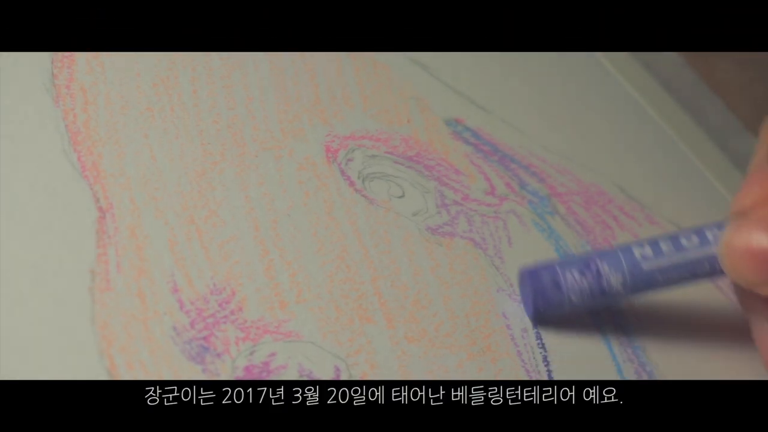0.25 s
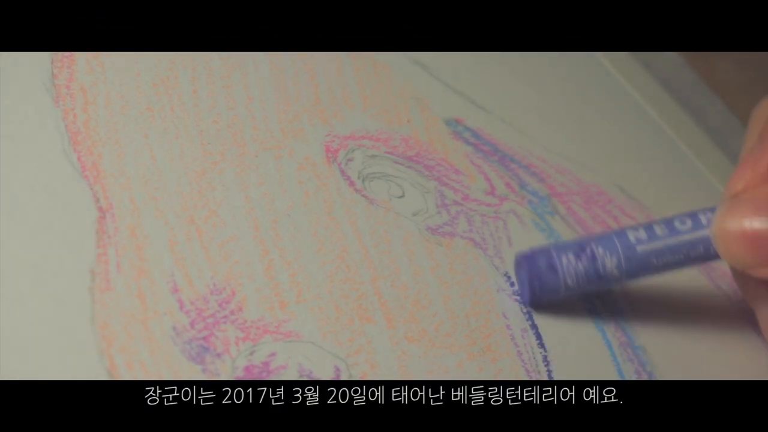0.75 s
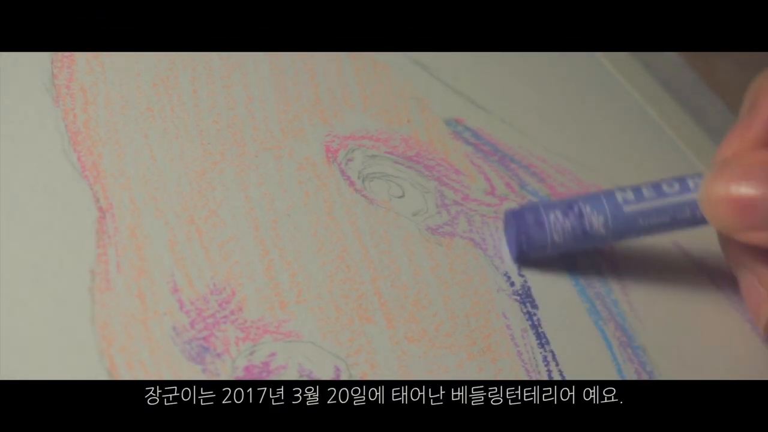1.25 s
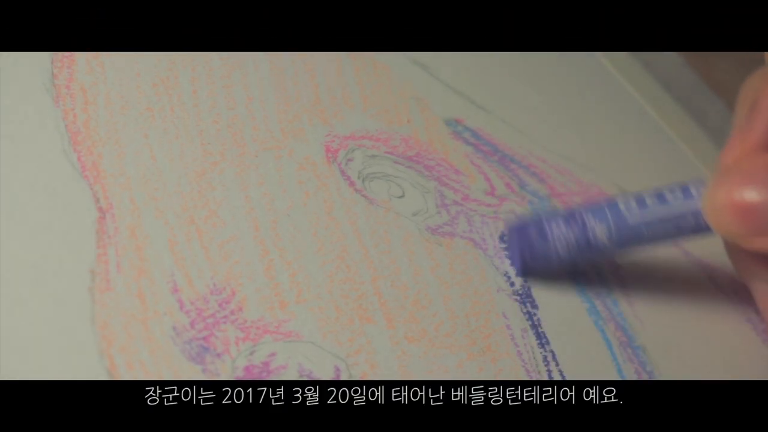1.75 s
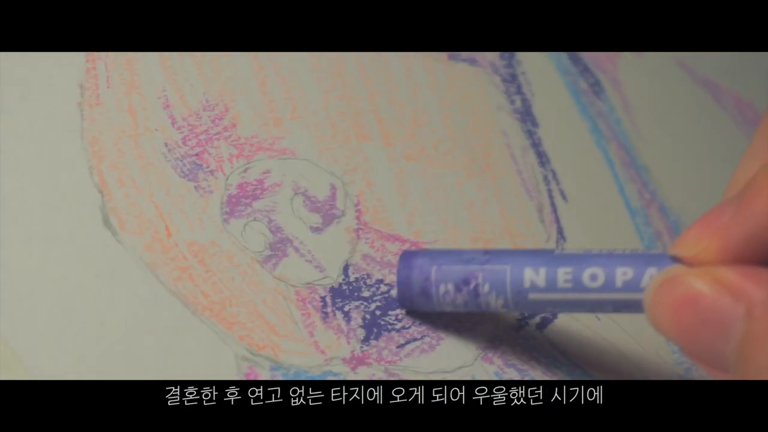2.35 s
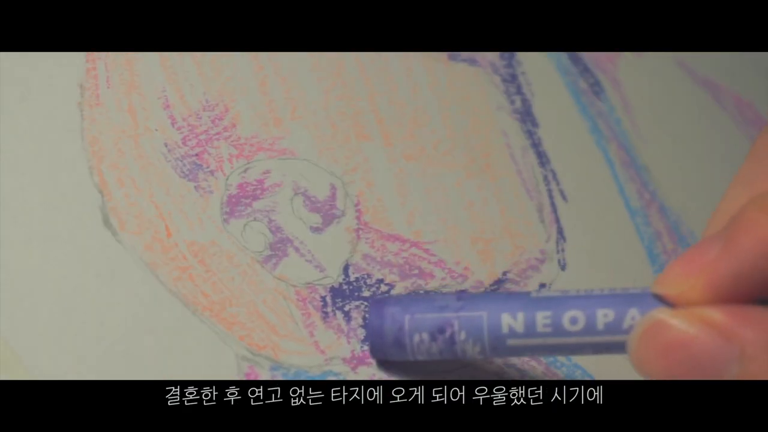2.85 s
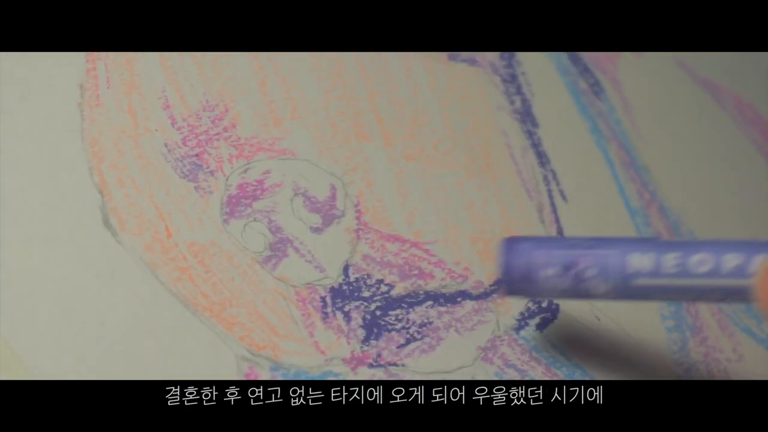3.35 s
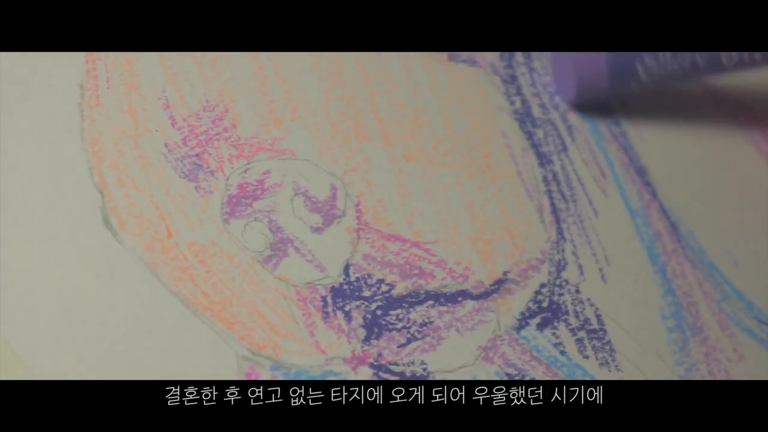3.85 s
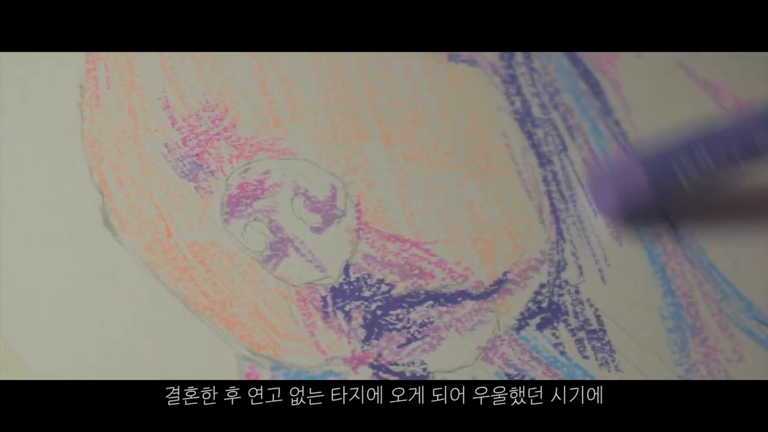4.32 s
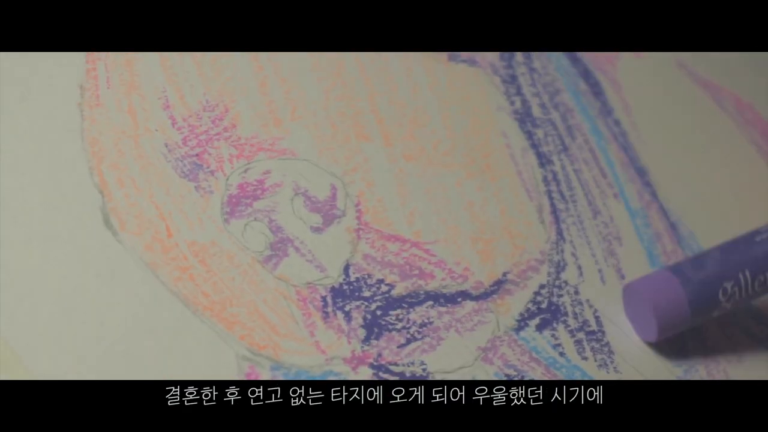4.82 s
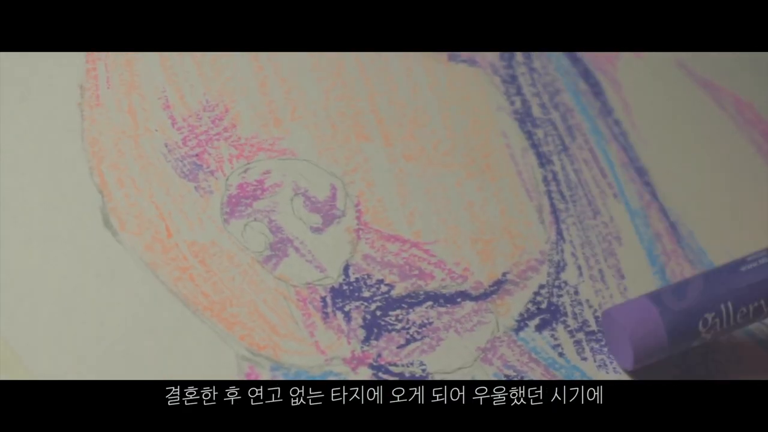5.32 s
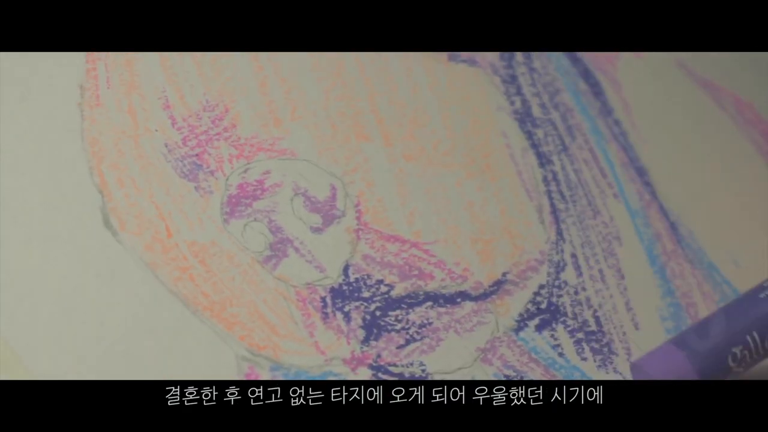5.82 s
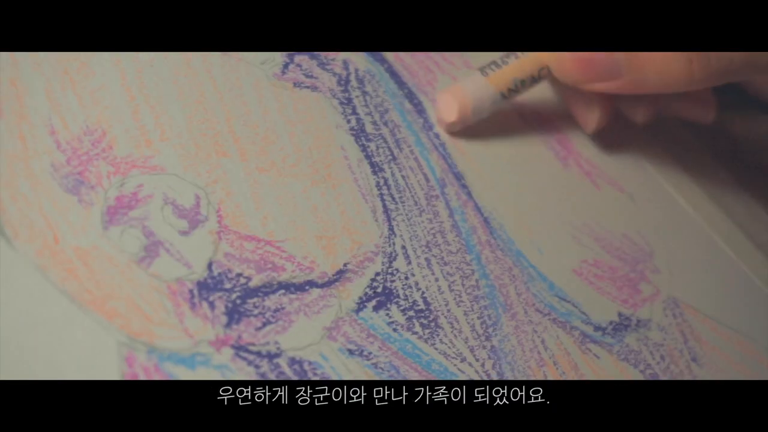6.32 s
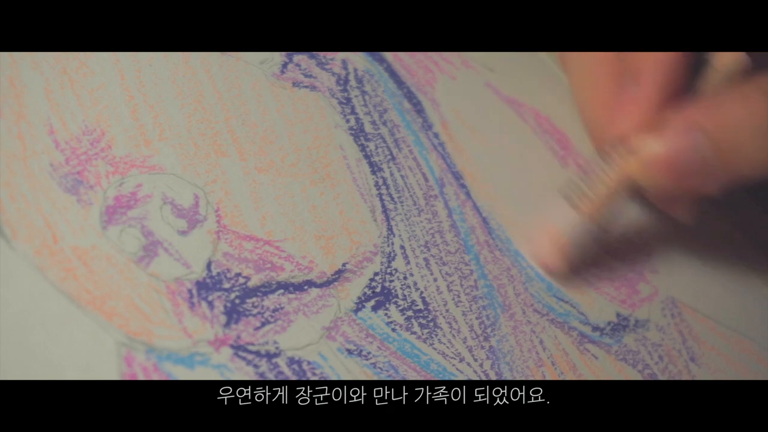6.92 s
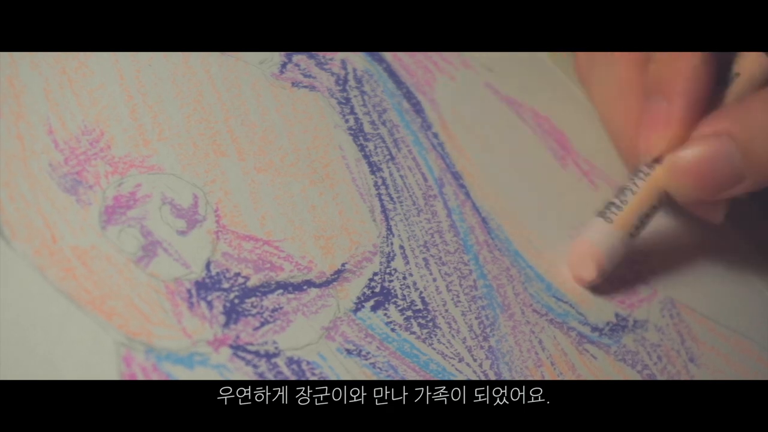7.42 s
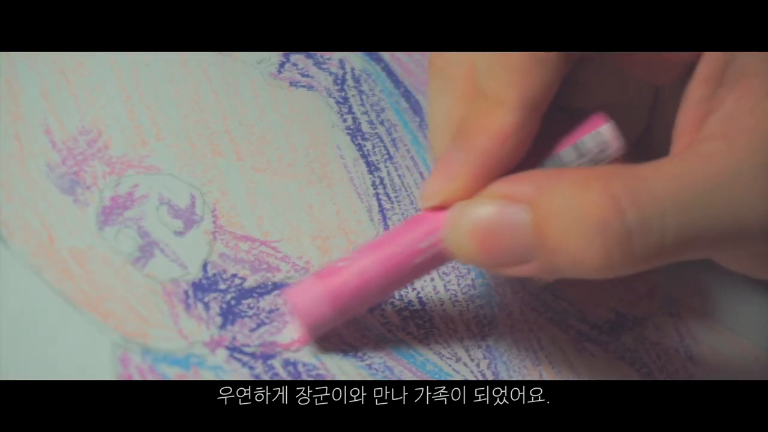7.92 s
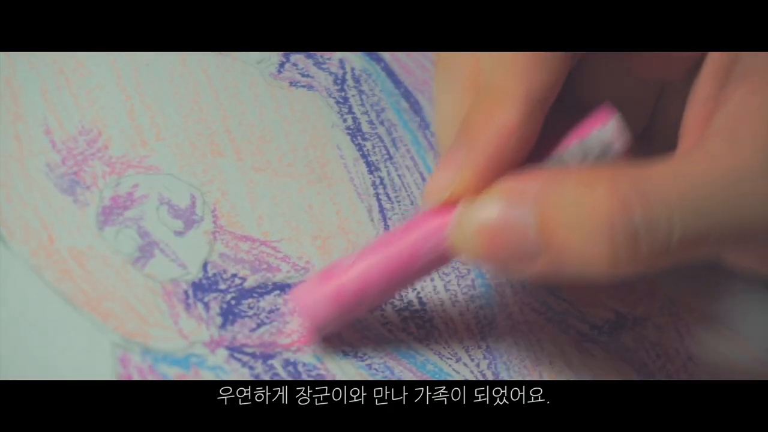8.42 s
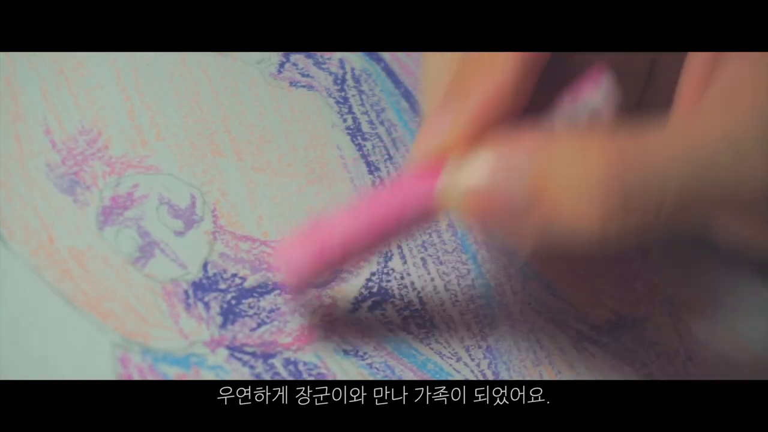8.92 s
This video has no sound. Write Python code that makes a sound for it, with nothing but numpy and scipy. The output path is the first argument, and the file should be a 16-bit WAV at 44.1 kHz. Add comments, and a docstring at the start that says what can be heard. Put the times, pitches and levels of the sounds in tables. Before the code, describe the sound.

In a small quiet room, a waxy stick rubs paper on a hollow board, heard very close. About a second of rapid muted strokes weakens to almost nothing, broken by tiny taps. Louder scrubbing returns, first regular with a slight thin rattle, later slower and scratchier with soft bumps, and finally weakens. Low table rumble and soft background hiss run throughout.

```python
"""Oil pastels scrub back and forth on paper that lies on a drawing board, heard close up in a quiet room.
Quick strokes come first: stick-slip clicks ring the board's modes, and grains of wax hiss on the paper.
From 2 s a pause holds a few weak strokes, knocks and short ticks; a thin metallic ring, as decaying modes,
sounds from 3.3 to 4.9 s. From 3.7 s stronger strokes with more wax hiss go on to the end, among knocks.
Filtered noise gives a deep rumble and a steady hiss with a faint hum throughout."""
import sys
import numpy as np
from scipy import signal
from scipy.fft import rfft, irfft, next_fast_len
from scipy.io import wavfile
from scipy.ndimage import uniform_filter1d

SR = 44100
rng = np.random.default_rng(int(sys.argv[2]) if len(sys.argv) > 2 else 0)


def transcribe(u):
    """Save the signal u as a 16-bit wav file named by the first command-line argument.

    u: samples, shape (n,) or (channels, n), limited to [-1, 1]; the rate is SR.
    q: integer samples, one column per channel.
    """
    v = np.clip(np.atleast_2d(u).T, -1, 1)
    q = np.round(v * 32767).astype(np.int16)
    wavfile.write(sys.argv[1], SR, q)


N = 403956
T = np.arange(N) / SR  # time [s]

# pastel strokes: (start [s], length [s], middle board modes [dB], low modes against middle [dB],
# high modes against middle [dB], wax hiss before the pastel's colour [dB])
STROKE_LIST = [(-0.02, 0.087, -57, 5.5, -9.5, -72), (0.115, 0.086, -55.5, -1, -24, -80),
               (0.211, 0.074, -60.5, -4, -12, -79), (0.339, 0.083, -50.5, -1.5, -20.5, -77),
               (0.457, 0.088, -51.5, 1, -21, -75), (0.59, 0.11, -57, 3, -12, -79),
               (0.701, 0.096, -58.5, 0, -20, -81), (0.819, 0.11, -48.5, -1, -17.5, -74),
               (0.936, 0.13, -53.5, -2, -11.5, -73), (1.06, 0.17, -58, -0.5, -16, -82),
               (1.197, 0.12, -68, 7, -3, -78), (1.5, 0.13, -73.5, 8, 3, -79),
               (1.603, 0.15, -59.5, -2, -19, -83), (1.721, 0.18, -60, 3.5, -12.5, -84),
               (1.945, 0.089, -72, 7, -2, -79), (2.265, 0.2, -70, 10, -11, -92),
               (3.173, 0.092, -69.5, 4.5, -11, -82), (3.703, 0.12, -50.5, -1, -15.5, -64.5),
               (3.866, 0.14, -61, 7.5, 1, -64), (4.04, 0.094, -44, -5, -15.5, -70),
               (4.172, 0.11, -41, -3.5, -16.5, -67.5), (4.317, 0.11, -42.5, -2.5, -24, -68.5),
               (4.466, 0.1, -38.5, -9, -20.5, -66.5), (4.61, 0.105, -46.5, -1.5, -13, -70),
               (4.727, 0.12, -45.5, 7, -17.5, -67.5), (4.883, 0.094, -42.5, -3.5, -23.5, -69),
               (4.997, 0.13, -46, -3.5, -29, -66.5), (5.145, 0.095, -48, -0.5, -36, -67),
               (5.254, 0.11, -48.5, -1, -19, -69.5), (5.379, 0.081, -55, 2, -8.5, -68),
               (5.49, 0.082, -43, -5.5, -23.5, -68.5), (5.752, 0.083, -50.5, -3.5, -22, -72.5),
               (5.893, 0.12, -67.5, 21, -6, -76.5), (6.062, 0.098, -46, -3.5, -21, -70),
               (6.204, 0.1, -45.5, -2, -8.5, -70), (6.413, 0.18, -45, -3.5, -7.5, -64.5),
               (6.657, 0.15, -51, 4, 1.5, -64.5), (6.867, 0.13, -41, -2, -14.5, -69),
               (7.057, 0.12, -58, 10.5, 9, -63.5), (7.271, 0.17, -45.5, 0.5, -6.5, -68.5),
               (7.483, 0.116, -44, 0, -4.5, -63), (7.663, 0.16, -47, -1, -3, -67.5),
               (7.81, 0.078, -57, 3.5, -5, -72), (7.914, 0.16, -48.5, 5.5, -12.5, -70),
               (8.113, 0.2, -56, 6, -4.5, -71.5), (8.373, 0.112, -47, 4, -17.5, -74),
               (8.518, 0.12, -59.5, 0, -7.5, -73), (8.655, 0.111, -67.5, 2, -11, -80),
               (9.032, 0.039, -48, 2.5, -6.5, -76), (9.087, 0.091, -63, 10, -1, -75)]
# colour of the pastel in hand: (time [s], upper modes against middle [dB], deepest modes against low [dB],
# hiss tilt towards treble [dB], hiss below 2.5 kHz [dB])
PASTEL_COLOUR = [(0.0, -8, -10, -1, 3.5), (0.8, 2, -10, -2.5, 6), (2.3, -12, -2.5, -7, 6.5),
                 (3.6, 2, -21, 15, 4), (3.9, 5, -16, -3.5, 0.5), (4.6, -0.5, -16, 6, 6),
                 (5.2, 7, -6, 3.5, -0.5), (6.0, 5, -3.5, -0.5, 1), (6.5, 3, -6.5, -2.5, -3),
                 (7.1, 0, -15.5, -6.5, -0.5), (7.7, 1, -7, -3.5, 4.5), (8.0, 0, 2, -3.5, 2),
                 (9.16, -1.5, -1, -6, 3)]
# short ticks, some with a metallic ring: (time [s], tick before its noise and colour [dB],
# peak of the thin ring [dB], peak of the ring's lowest mode [dB])
SHORT_TICKS = [(2.1225, -57, -90, -90), (2.2795, -52, -90, -80), (3.284, -70, -53, -80),
               (3.3315, -57, -50, -58), (3.694, -57, -80, -80), (6.33, -50, -80, -80),
               (9.0478, -45, -90, -90)]
PEAK_SHARE = 0.5  # share of a stroke before its greatest pressure


def amp(db):
    """Level to amplitude: 20 dB is a factor of ten."""
    return 10 ** (np.asarray(db) / 20)


def evened(x):
    """Normalisation to an rms value of 1."""
    return x / np.sqrt(np.mean(x ** 2) + 1e-20)


def colour(x, points):
    """Linear filtering: the spectrum of x is weighted by a curve of (frequency [Hz], level [dB])."""
    f, db = np.transpose(points)
    size = next_fast_len(len(x))
    hz = np.arange(size // 2 + 1) * SR / size
    gain = amp(np.interp(np.log(hz + 1), np.log(f + 1), db))
    return irfft(rfft(x, size) * gain, size)[:len(x)]


def body(modes, low_hz, high_hz, order):
    """Modal superposition: damped sines, limited to a band, form an impulse response of energy 1."""
    t = T[:8192]
    response = np.zeros(len(t))
    for hz, width_hz, db in modes:
        decay = np.exp(-np.pi * width_hz * t)
        response += amp(db) * np.sqrt(width_hz) * decay * np.sin(2 * np.pi * hz * t)
    band = signal.butter(order, [low_hz, high_hz], "bandpass", fs=SR, output="sos")
    response = signal.sosfilt(band, response)
    return response / np.linalg.norm(response)


def excite(response, drive, s, peak_db):
    """Convolution principle: a body answers a steady drive and single impulses of given peak level."""
    impulses = np.zeros(N)
    impulses[np.round(s * SR).astype(int)] = amp(peak_db) / np.abs(response).max()
    return signal.oaconvolve(drive + impulses, response)[:N]


def clicks(per_s, spread_db):
    """Stick-slip as a random pulse train: slips of either sign, a few of them large, rms 1."""
    when, sign, size = rng.random((N, 3)).T
    happens = when < per_s / SR
    height = amp(spread_db * np.minimum(-np.log(size + 1e-9), 4))
    return evened(happens * np.sign(sign - .5) * height)


def pressure(at, rise, fall, db, drop_db=16.5, rise_edge=3.14, fall_edge=2.14):
    """Friction grows with pressure: rms swells to db at each peak and is drop_db down at rise and fall [s]."""
    t = T[::64, None] - at
    distance = np.abs(t) / np.maximum(np.where(t < 0, rise, fall), .01)
    edge = np.where(t < 0, rise_edge, fall_edge)
    power = amp(db - drop_db * distance ** edge) ** 2
    return np.interp(T, T[::64], np.sqrt(power.sum(1)))


def hiss():
    """Stationary noise: room tone and preamplifier hiss, partly unlike in the channels, with a wavering hum."""
    # noise spectrum: (frequency [Hz], relative density [dB])
    noise_spectrum = [(26, -19), (45, 6), (181, -4), (215, -1), (231, -5.5), (506, -11), (888, -15.5),
                      (1310, -19.5), (1410, -20.5), (3490, -26), (15500, -29.5)]
    # spread of the noise: (frequency [Hz], side against middle [dB])
    noise_spread = [(60, -20.5), (150, -12), (380, -8.5), (950, -8), (2380, -7), (5980, -10), (15000, -21)]
    hiss_db, hum_hz, hum_db = -63.5, 209.9, -78  # rms levels
    a, b, c = rng.standard_normal((3, N))
    mid = colour(a, noise_spectrum)
    side = colour(colour(b, noise_spectrum), noise_spread)
    scale = amp(hiss_db) / np.std(mid)
    slow_noise = uniform_filter1d(uniform_filter1d(c, 6000), 6000)
    waver = 1 + 0.057 * evened(slow_noise)
    hum = amp(hum_db) * np.sqrt(2) * waver * np.sin(2 * np.pi * hum_hz * T)
    return scale * mid + hum, scale * side


def sway():
    """Low-frequency vibration: band-shaped noise is the rumble of board and table under the moving arm."""
    # strength of the rumble: (time [s], level [dB])
    rumble_course = [(0.0, -55), (0.38, -49.5), (0.97, -53.5), (1.84, -45), (2.34, -53), (3.67, -59.5),
                     (3.72, -48.5), (5.64, -49.5), (5.74, -60.5), (6.35, -50), (7.96, -44), (8.8, -40),
                     (9.16, -45)]
    # rumble spectrum: (frequency [Hz], relative density [dB])
    rumble_spectrum = [(2.4, -41), (4.0, 11.5), (20, 9.5), (30, -2), (54, -7.5), (75, -22.5), (100, -6),
                       (130, -44), (220, -120)]
    s, db = np.transpose(rumble_course)
    return evened(colour(rng.standard_normal(N), rumble_spectrum)) * amp(np.interp(T, s, db))


def reflections(x, t60=0.077, power_swings_per_s=0.59):
    """Early reflections: short random tails [t60 in s] cross-fade as the hand moves and part the channels."""
    # spread of the reflections: (frequency [Hz], side against middle [dB])
    reflection_spread = [(60, -51), (120, -13.5), (240, -6.5), (480, -17), (950, -14), (1890, -17),
                         (3770, -24), (7520, -20), (15000, -77)]
    tails = rng.standard_normal((3, 4096)) * amp(-60 * T[:4096] / t60)
    phase = np.pi * (power_swings_per_s * T + np.arange(3)[:, None] / 3)
    fades = np.sqrt(2 / 3) * np.cos(phase)  # squares sum to 1
    wet = signal.oaconvolve(x * fades, tails / np.linalg.norm(tails[0]), axes=1)[:, :N]
    return colour(wet.sum(0), reflection_spread)


def ring():
    """Modal resonance: small clicks shake a thin metallic ring, and single impulses set it off at the ticks."""
    # modes of the ring: (frequency [Hz], width [Hz], level [dB])
    ring_modes = [(1700, 70, -14), (2420, 170, -3.5), (3490, 95, 0), (4720, 120, -8), (6020, 100, -15)]
    # when the ring is shaken up: (middle [s], length [s], level [dB])
    shakes = [(3.30, 0.06, -74), (3.81, 0.11, -69), (4.125, 0.11, -69), (4.275, 0.08, -71),
              (4.39, 0.13, -70), (4.54, 0.14, -69), (4.68, 0.1, -70), (4.83, 0.1, -76), (4.92, 0.07, -78)]
    s, _, db, lowest_db = np.transpose(SHORT_TICKS)
    at, length, shake_db = np.transpose(shakes)
    shake = clicks(per_s=2700.0, spread_db=3.0) * pressure(at, length / 2, length / 2, shake_db)
    whole = excite(body(ring_modes, 1030, 9600, order=2), shake, s, db)
    lowest = excite(body(ring_modes[:1], 1100, 7000, order=2), 0, s, lowest_db)
    return whole + lowest


def ticks():
    """Broadband transient: each tick is a few milliseconds of decaying noise, drawn anew."""
    s, db = np.transpose(SHORT_TICKS)[:2]
    burst = excite(np.exp(-T[:600] / .0015), 0, s, db) * rng.standard_normal(N)
    shape = [(300, 0), (900, 6), (2000, 2), (4000, -4), (8000, -9), (16000, -15)]  # (Hz, dB)
    return colour(burst, shape)


def patchy(x, patch_db):
    """Surface roughness: patches of the spectrum, some hundred Hz by 50 ms, rise and sink at random."""
    z = signal.stft(x, nperseg=512, noverlap=384)[2]
    patches = uniform_filter1d(rng.standard_normal(z.shape), size=7, axis=0)
    patches = uniform_filter1d(patches, size=18, axis=1)
    return signal.istft(z * amp(patch_db * evened(patches)), nperseg=512, noverlap=384)[1][:N]


def wax():
    """Friction noise: dense grains of wax on paper, in low, dull and bright parts that each pastel weighs."""
    # spectrum of the grains: (frequency [Hz], relative level [dB])
    wax_spectrum = [(900, -18), (1300, -2), (1800, 2), (2800, -4.5), (5200, -4), (7200, -4), (9000, -5.5),
                    (12000, -5.5), (16000, -9.5)]
    wax_peak_share, wax_stretch = 0.44, 1.15  # earlier in its span, and longer than the stroke
    start, length, *_, db = np.transpose(STROKE_LIST)
    at, span = start + PEAK_SHARE * length, wax_stretch * length
    rise, fall = wax_peak_share * span, (1 - wax_peak_share) * span
    when, *_, tilt_db, low_db = np.transpose(PASTEL_COLOUR)
    tilt, low_gain = np.interp(at, when, tilt_db), np.interp(T, when, low_db)
    grains = evened(patchy(colour(clicks(per_s=8300.0, spread_db=3.5), wax_spectrum), patch_db=3.0))
    dull = colour(grains, [(6000, 0), (8500, -6), (12000, -30)])
    low = colour(dull, [(2000, 0), (2500, -6), (3200, -30)])
    bright = grains - dull
    weighed_dull = dull + (amp(low_gain) - 1) * low
    return (weighed_dull * pressure(at, rise, fall, db - tilt / 2)
            + bright * pressure(at, rise, fall, db + tilt / 2))


def board():
    """Modal excitation: slips and knocks ring the board; the place of contact sets each group's share."""
    # board modes by group: (frequency [Hz], width [Hz], level [dB])
    low_modes = [(111, 2.8, -26), (138.4, 8.2, -2), (165.7, 23, 4), (212, 137, 7.5)]
    middle_modes = [(256.4, 19, -3.5), (275.6, 98, 0), (296.5, 13, -1.5)]
    upper_modes = [(371.5, 11, 4), (401, 130, 1.5), (404, 33, -3)]
    high_modes = [(544, 38, 8), (616, 42, 10.5), (688, 69, 18), (796, 48, 10.5), (840, 70, -3),
                  (958, 52, 0), (1077, 83, -12)]
    # soft blows as the pastel lands or catches: (time [s], peak before the groups' losses [dB],
    # hardness [-1 low modes, 0 middle, 1 high])
    soft_blows = [(0.139, -41.5, -0.83), (0.644, -42.5, 0.29), (2.122, -33.5, -1.27), (2.279, -40, -0.83),
                  (3.921, -37, 0.44), (4.344, -45.5, 0.58), (4.52, -35, 0.27), (4.652, -36, -0.04),
                  (4.748, -30.5, -0.6), (4.778, -36, 0.35), (5.026, -35, -0.76), (5.408, -46, 0.074),
                  (6.102, -46, -0.65), (6.214, -53, 1.1), (6.424, -40.5, -1.1), (6.523, -41, -0.68),
                  (6.68, -53, 0.2), (6.929, -31.5, 0.0096), (7.123, -36, 0.7), (7.14, -29, 0.62),
                  (7.31, -33, 0.23), (7.378, -40, -0.48), (7.522, -34.5, 1.4), (7.677, -43, 0.42),
                  (7.708, -32.5, -0.03), (9.053, -38, -0.4)]
    upper_follows = 0.52  # share of the high modes' dB that the upper ones follow
    high_stretch = 0.96  # length of the high modes' swell against the stroke
    focus_db, most_loss_db = 19.5, 17.0  # loss one group away from a blow's hardness, and its limit
    deep_knock_db = 11.5  # further loss of the deepest modes

    start, length, db, low, high, _ = np.transpose(STROKE_LIST)
    at, rise, fall = start + PEAK_SHARE * length, PEAK_SHARE * length, (1 - PEAK_SHARE) * length
    when, upper_db, deep_db, *_ = np.transpose(PASTEL_COLOUR)
    upper = np.interp(at, when, upper_db) + upper_follows * high
    deep = low + np.interp(at, when, deep_db)

    s, peak_db, hardness = np.transpose(soft_blows)
    mismatch = hardness - np.arange(-1, 2)[:, None]
    knock_low, knock_mid, knock_high = peak_db - np.minimum(focus_db * mismatch ** 2, most_loss_db)

    # the grip judders
    grip = evened(uniform_filter1d(uniform_filter1d(rng.standard_normal(N), size=500), size=500))
    rubbing = clicks(per_s=1000., spread_db=3.5) + 0.65 * rng.standard_normal(N)
    slips = evened(rubbing * amp(2.76 * grip))

    # the soft wax contact keeps each group inside its band:
    # (response, stroke level [dB], knock peak [dB], stretch of the stroke)
    groups = ((body(low_modes[:2], 84.5, 183, order=2), db + deep, knock_low - deep_knock_db, 1),
              (body(low_modes[2:], 107.5, 267, order=3), db + low, knock_low, 1),
              (body(middle_modes, 174, 452, order=3), db, knock_mid, 1),
              (body(upper_modes, 256.0, 618, order=3), db + upper, knock_mid, 1),
              (body(high_modes, 370, 1370, order=7), db + high, knock_high, high_stretch))
    total = np.zeros(N)
    for response, rub_db, knock_db, stretch in groups:
        drive = slips * pressure(at, stretch * rise, stretch * fall, rub_db)
        total += excite(response, drive, s, knock_db)
    return total


def scene():
    """Superposition: drawing in the middle, its reflections at the sides, over rumble and hiss."""
    drawing = board() + wax() + ticks() + ring()
    mid, side = hiss()
    mid = mid + drawing + sway()
    side = side + reflections(drawing)
    return np.array([mid + side, mid - side])


def record(dry):
    """Band limitation: a linear-phase low-pass filter removes what lies above its edge."""
    edge_hz = 15720
    taps = signal.firwin(1023, edge_hz, window=("kaiser", 9), fs=SR)
    padded = np.pad(dry, ((0, 0), (511, 511)), "reflect")
    return signal.oaconvolve(padded, taps[None], "valid", axes=1)


dry = scene()
out = record(dry)
transcribe(out)
```